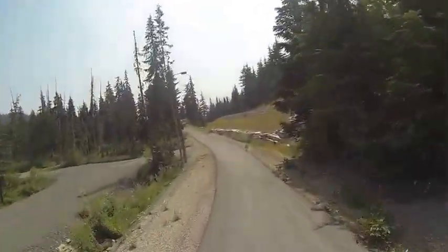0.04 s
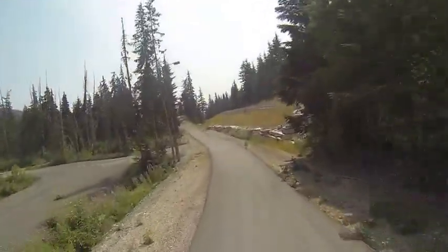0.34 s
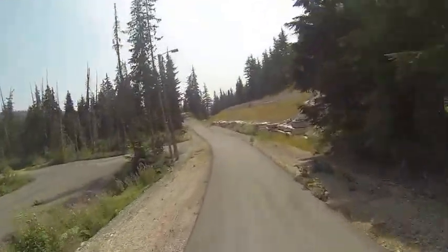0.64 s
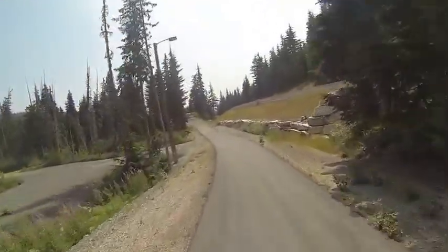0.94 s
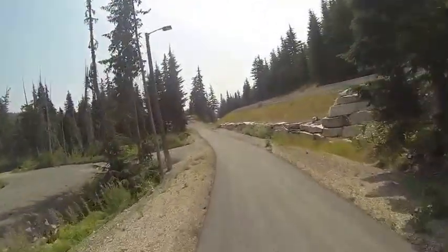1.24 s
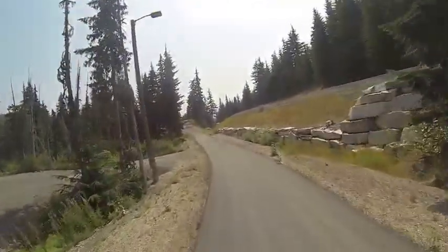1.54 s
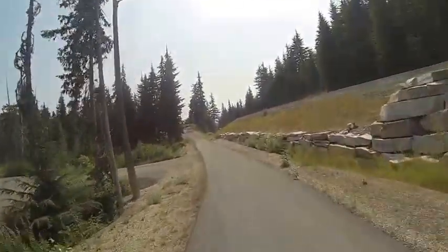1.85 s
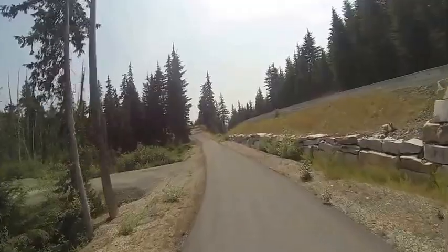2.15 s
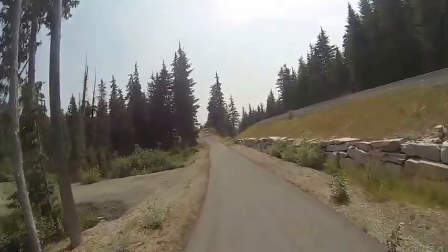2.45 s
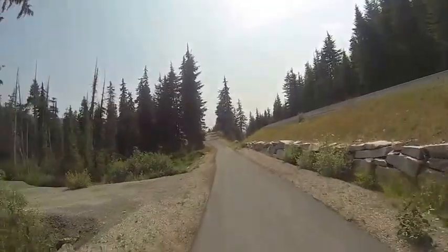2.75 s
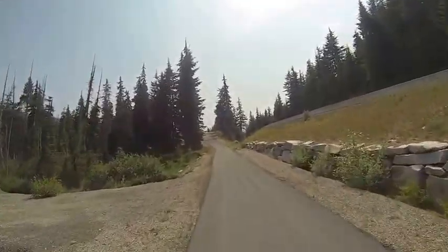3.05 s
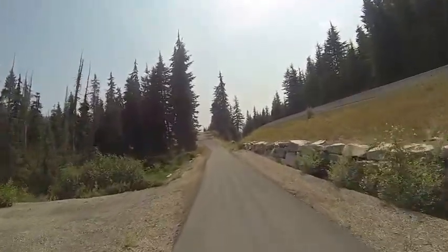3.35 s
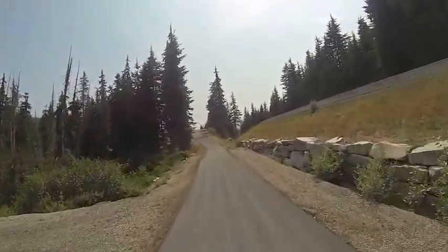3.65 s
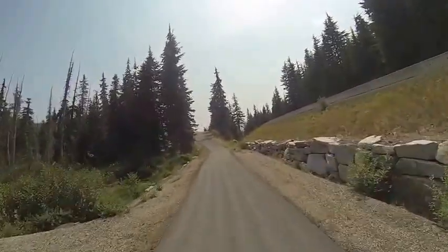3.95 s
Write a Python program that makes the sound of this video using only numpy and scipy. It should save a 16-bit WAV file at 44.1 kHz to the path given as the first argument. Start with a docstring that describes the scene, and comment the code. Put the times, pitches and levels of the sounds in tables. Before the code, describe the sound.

Roller skis rattle and hiss along an asphalt path, then the rolling dies down.

```python
"""Roller skis rattle and hiss along an asphalt path, heard from a camera the skier carries.
The grain of the road rings wheels and frames, the camera mount shudders and air buffets the microphone.
A wheel scuffs once and a gust passes. The rolling dies down after 2.4 s, a few bits of grit tick,
and a hard clatter, perhaps a pole tip, starts at the very end."""
import sys
import numpy as np
from scipy import signal
from scipy.fft import rfft, irfft
from scipy.io import wavfile
from scipy.ndimage import uniform_filter1d

SR = 44100
rng = np.random.default_rng(int(sys.argv[2]) if len(sys.argv) > 2 else 0)


def store_pcm(level_fs):
    """Save levels as 16-bit WAV."""
    pcm = np.round(np.clip(level_fs, -1, 1) * 32767).astype(np.int16)
    wavfile.write(sys.argv[1], SR, np.atleast_2d(pcm).T)


N = 176400

# The swell and fall of the rolling. Each row: time in seconds, relative level in dB.
ROLLING_LEVEL = [(0, -33.5), (.15, -35.5), (.45, -32), (.62, -31), (.85, -32), (1.15, -30), (1.5, -30),
                 (1.8, -31), (1.92, -29), (2.12, -29), (2.4, -33), (2.75, -38.5), (3.08, -47.5),
                 (3.96, -50)]


def undb(db):
    return 10 ** (np.asarray(db) / 20)


def unit(x):
    """Scale to rms 1."""
    return x / np.sqrt(np.mean(x ** 2))


def envelope(rows):
    """Gain over time, drawn through points of seconds and dB."""
    return undb(np.interp(np.arange(N) / SR, *np.array(rows).T))


def colour(x, points, modes=()):
    """Causal EQ: a broad tone curve with resonances added. The result has rms 1."""
    freqs = np.arange(N // 2 + 1) * SR / N + 1e-6
    hz, db = np.array(points).T
    power = undb(np.interp(np.log(freqs), np.log(hz), db)) ** 2
    for centre, width, peak in modes:
        power += (undb(peak) / (1 + ((freqs - centre) / width) ** 2)) ** 2
    cepstrum = irfft(np.log(power), N)
    cepstrum[N // 2:] = 0  # minimum phase: the ringing follows each hit
    return unit(irfft(rfft(x) * np.exp(rfft(cepstrum)), N))


def band(x, hz, width_hz):
    """A steep band-pass: two coupled resonances."""
    edges = [hz - width_hz / 2, hz + width_hz / 2]
    return signal.sosfilt(signal.butter(2, edges, "band", fs=SR, output="sos"), x)


def wander(rate_hz):
    """Smooth random modulation with rms 1."""
    hold = int(SR / rate_hz)
    steps = np.repeat(rng.standard_normal(N // hold + 1), hold)
    return unit(uniform_filter1d(uniform_filter1d(steps, hold), hold)[:N])


def road_grains(spread_db, per_second=6000):
    """Dense tiny impacts of the wheels on the stones of the asphalt."""
    hits = rng.random(N) < per_second / SR
    polarity = rng.choice([-1, 1], N)
    return hits * polarity * undb(spread_db * np.minimum(rng.exponential(size=N), 5))


def still_air(level_db=-83.5):
    """A faint, steady bed of outdoor noise."""
    # The tone of the air. Each row: frequency in Hz, relative level in dB.
    air_tone = [(100, -1), (2000, -8.5), (6000, -17.5), (12000, -27), (16000, -28.5)]
    return colour(rng.standard_normal(N), air_tone) * undb(level_db)


def wheels(rattle_gain_db=1.0, flutter_db=.5):
    """Coarse grain rings wheels and frames, fine grit hisses above; both flutter with the load."""
    # The broad body of wheels and frames. Each row: frequency in Hz, relative level in dB.
    body_tone = [(70, -17), (130, -8.5), (240, -7.5), (350, -14), (470, -13), (570, -20.5), (660, -9.5),
                 (920, -10.5), (1130, -16), (1260, -2), (1620, 0.5), (1800, -6), (2060, -15), (2750, -16.5),
                 (2950, -20.5), (3200, -21.5), (3450, -24), (3980, -26.5), (4250, -40), (4700, -66),
                 (8000, -84.5)]
    # Their narrow resonances. Each row: centre in Hz, half-width in Hz, relative peak in dB.
    body_modes = [(165, 20, -11), (422, 45, -11.5), (735, 35, -5), (1253, 45, 0), (1490, 100, -4),
                  (3075, 50, -18), (3665, 70, -26), (4016, 35, -26)]
    # The tone of the grit hiss. Each row: frequency in Hz, relative level in dB.
    hiss_tone = [(3800, -24), (4600, -9.5), (4950, -2), (5400, -4.5), (5800, -15.5), (6000, -23.5),
                 (6600, -20), (7100, -21.5), (7900, -29.5), (8600, -38), (10200, -41), (11500, -50),
                 (13000, -59.5)]
    # Resonances in the hiss. Each row: centre in Hz, half-width in Hz, relative peak in dB.
    hiss_modes = [(4376, 30, -4), (4980, 50, 1), (5707, 60, -9), (6184, 50, -4), (6380, 50, -8),
                  (6698, 55, -2)]
    # The swells of the hiss. Each row: time in seconds, level in dB.
    hiss_level = [(0, -72), (.1, -76), (.3, -74), (.39, -66), (.63, -62.5), (.71, -68.5), (.8, -62.5),
                  (.87, -68.5), (1.05, -61), (1.3, -59.5), (1.52, -59.5), (1.83, -63.5), (1.89, -57.5),
                  (2.15, -57.5), (2.41, -62.5), (2.5, -68), (2.75, -72), (3.1, -82), (3.9, -85)]
    rattle = colour(road_grains(spread_db=1.8), body_tone, body_modes) * envelope(ROLLING_LEVEL)
    hiss = colour(road_grains(spread_db=3), hiss_tone, hiss_modes) * envelope(hiss_level)
    flutter = undb(flutter_db * wander(rate_hz=30.12))
    return (rattle * undb(rattle_gain_db) + hiss) * flutter


def mount_shudder(t, pitch_hz=58.95, hum_gain_db=-5):
    """The mount hums with the road and swings at its own pitch over each bump."""
    # Bumps in the path. Each row: centre in seconds, half-length in seconds, peak level in dB.
    bumps = [(0.244, 0.048, -24.5), (0.371, 0.073, -25.5), (0.797, 0.013, -24.5), (1.267, 0.031, -19),
             (1.421, 0.088, -29.5), (1.74, .05, -25), (1.86, 0.031, -20.5), (1.986, 0.016, -26),
             (2.659, .05, -29), (3.377, 0.016, -37.5)]
    hum = unit(band(rng.standard_normal(N), pitch_hz, width_hz=29))
    out = hum * envelope(ROLLING_LEVEL) * undb(hum_gain_db)
    for at, half_length, db in bumps:
        swell = undb(db) * np.exp(-((t - at) / half_length) ** 2)
        out += swell * np.cos(2 * np.pi * pitch_hz * (t - at))
    return out


def wind(t, gain_db=-3.5, gust_at_s=.91, gust_half_length_s=.08, gust_rise_db=10):
    """Air buffets the microphone: a low rumble that follows the rolling, with one gust."""
    # The tone of the buffeting. Each row: frequency in Hz, relative level in dB.
    wind_tone = [(5, -3), (12, 10), (20, -2), (30, -2), (42, -1.5), (90, -19.5), (200, -30.5), (600, -88)]
    gust = undb(gust_rise_db * np.exp(-((t - gust_at_s) / gust_half_length_s) ** 2))
    return colour(rng.standard_normal(N), wind_tone) * envelope(ROLLING_LEVEL) * gust * undb(gain_db)


def wheel_scuff(t, at_s=.634, half_length_s=.014, pitch_hz=3600, width_hz=800, level_db=-46):
    """A wheel slips for a moment and rings one high resonance."""
    slip = np.exp(-((t - at_s) / half_length_s) ** 2)
    scrape = band(road_grains(spread_db=1.8), pitch_hz, width_hz)
    ring = band(scrape, pitch_hz, width_hz)
    return unit(ring) * undb(level_db) * slip


def grit_ticks(t, decay_s=.00056, tail_db=-26, tail_decay_s=.011):
    """Bits of grit make tiny bright ticks, each with a faint sizzling tail."""
    # The ticks of grit. Each row: start in seconds, peak level in dB, pitch in Hz.
    ticks = [(3.2908, -61, 9400), (3.353, -42, 7140), (3.3527, -50, 11400), (3.3612, -50, 11300),
             (3.3614, -55, 7400), (3.3765, -63, 11300), (3.3968, -69, 8000), (3.4173, -57, 9500),
             (3.4603, -66, 9150)]
    out = np.zeros(N)
    for at, db, hz in ticks:
        age = np.maximum(t - at, 0)
        snap = np.exp(-age / decay_s)
        tail = undb(tail_db) * np.exp(-age / tail_decay_s)
        shape = (t > at) * (snap + tail) + 1e-18
        tick = band(shape * rng.standard_normal(N), hz, width_hz=920)
        out += undb(db) * tick / np.abs(tick).max()
    return out


def clatter(t, detune_spread=.02):
    """A hard contact bounces, ringing the same short modes slightly detuned each time."""
    # The bounces. Each row: start in seconds, peak level in dB.
    bounces = [(3.9869, -28), (3.990, -28.5), (3.9927, -20.5), (3.9948, -21.5)]
    # The struck modes. Each row: pitch in Hz, relative level in dB, seconds to fall by 60 dB.
    struck_modes = [(475, -10.5, 0.067), (1830, -6, 0.021), (2130, 0, 0.015), (3620, -7, 0.013),
                    (4380, -6, 0.011), (7300, -6, .007), (9160, -10, .005), (11800, -11, 0.0051)]
    out = np.zeros(N)
    for at, db in bounces:
        age = t[t > at] - at
        ring = np.zeros_like(age)
        for hz, mode_db, t60 in struck_modes:
            detuned_hz = hz * (1 + detune_spread * rng.standard_normal())
            ring += undb(mode_db - 60 * age / t60) * np.sin(2 * np.pi * detuned_hz * age)
        out[t > at] += undb(db) * ring / np.abs(ring).max(initial=1)
    return out


def scene():
    """All layers mixed in mono."""
    t = np.arange(N) / SR
    bed = still_air() + wheels() + mount_shudder(t) + wind(t)
    return (bed + wheel_scuff(t) + grit_ticks(t) + clatter(t))[None]


def record(dry, fade_in_s=.004, high_cut_hz=14000):
    """A quick fade-in and the camera's steep high cut."""
    fade = np.minimum(np.arange(N) / SR / fade_in_s, 1)
    high_cut = signal.ellip(8, .2, 70, high_cut_hz, fs=SR, output="sos")
    return signal.sosfilt(high_cut, dry * fade)


dry = scene()
out = record(dry)
store_pcm(out)
```